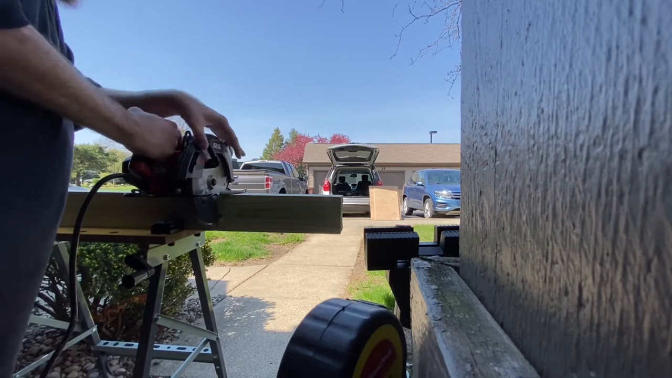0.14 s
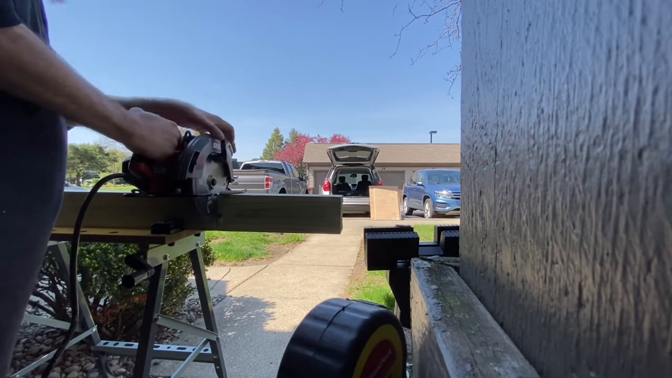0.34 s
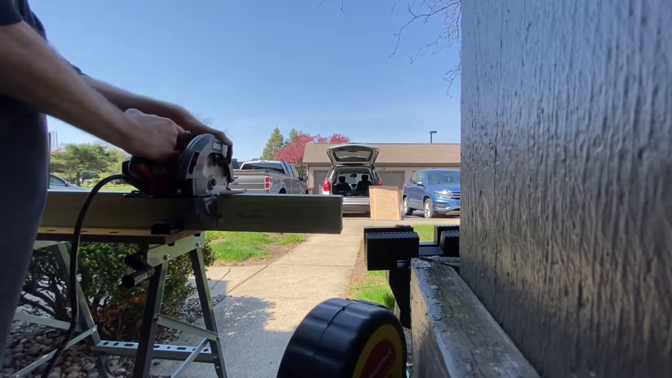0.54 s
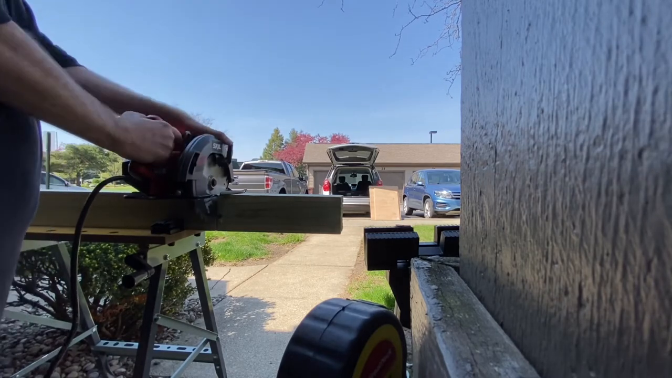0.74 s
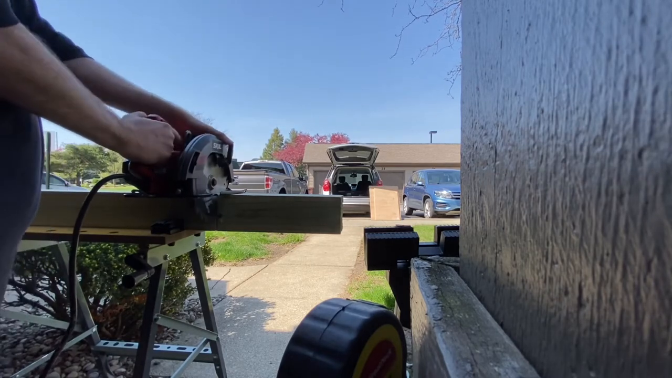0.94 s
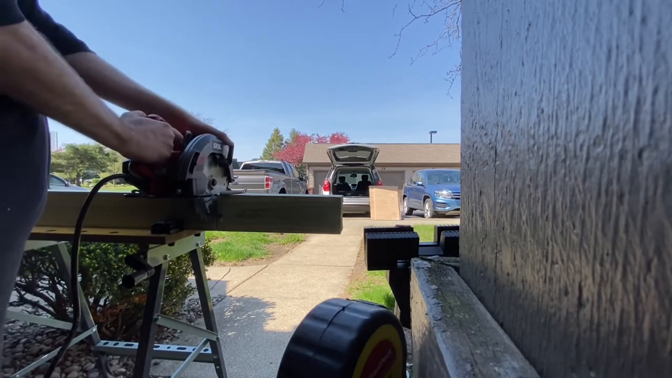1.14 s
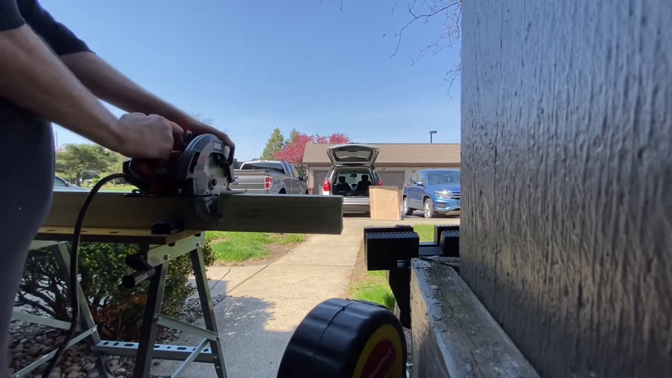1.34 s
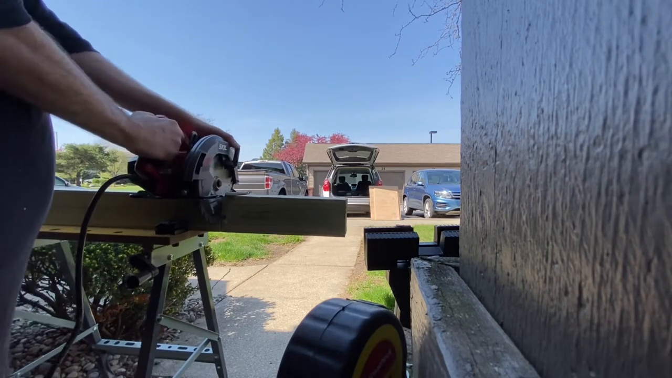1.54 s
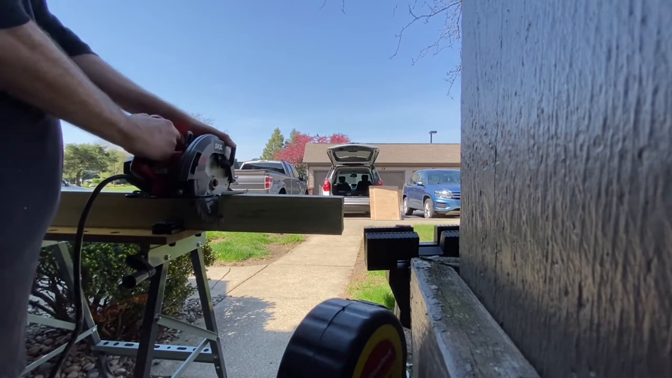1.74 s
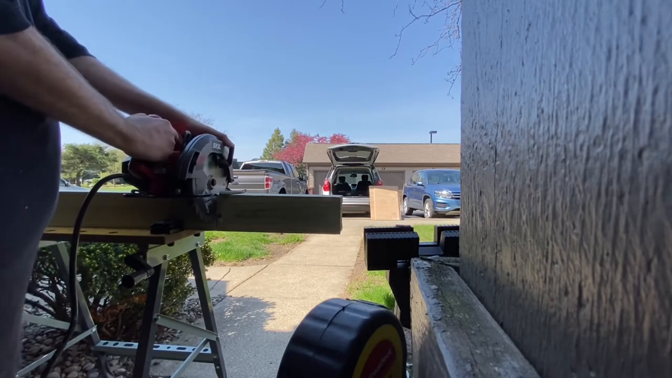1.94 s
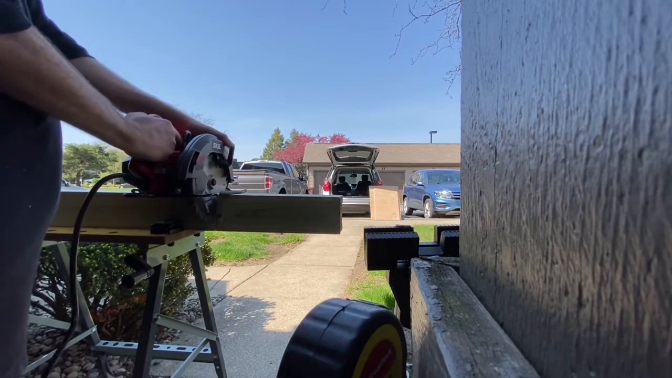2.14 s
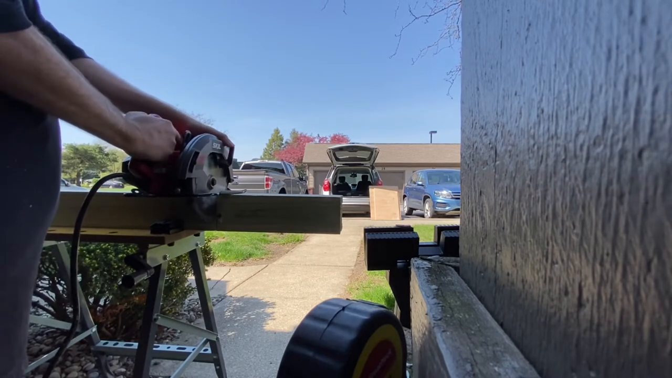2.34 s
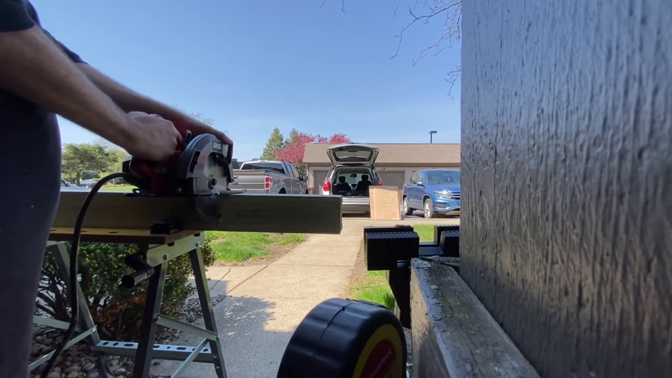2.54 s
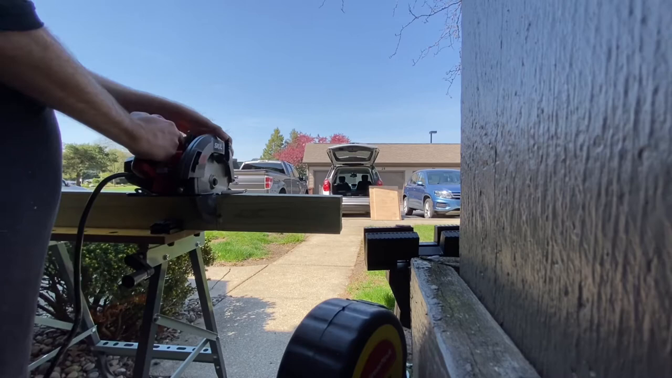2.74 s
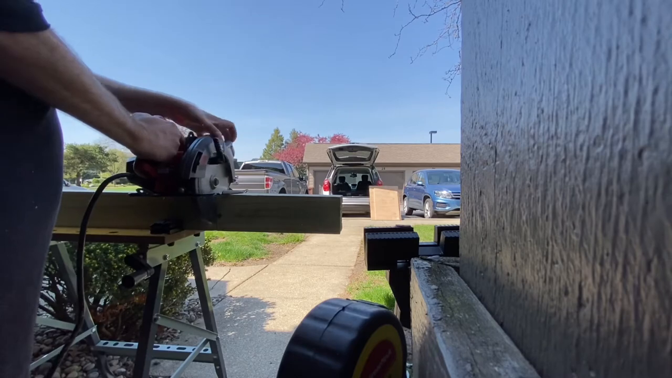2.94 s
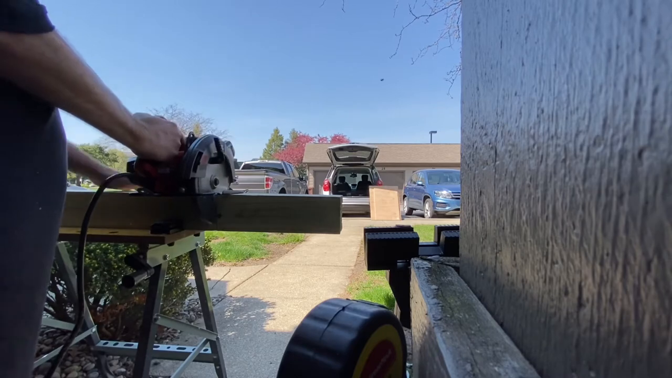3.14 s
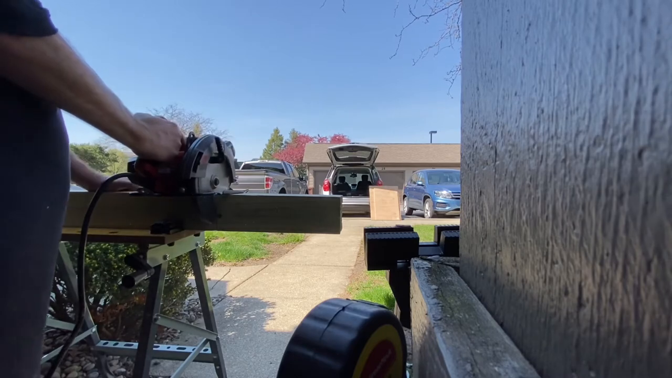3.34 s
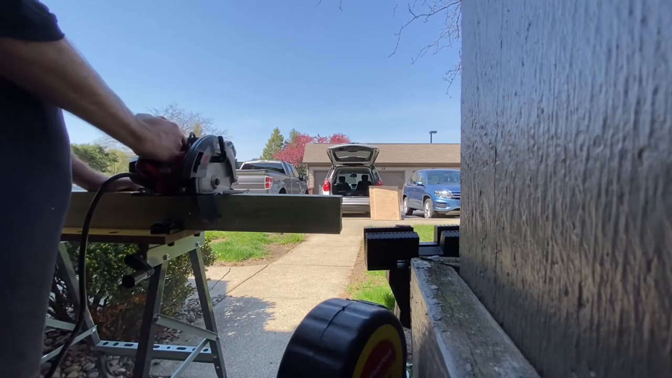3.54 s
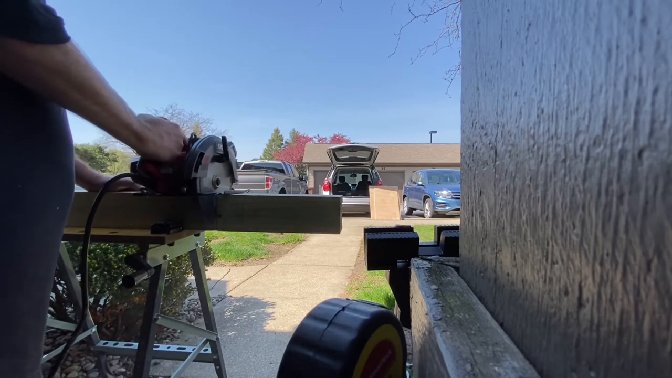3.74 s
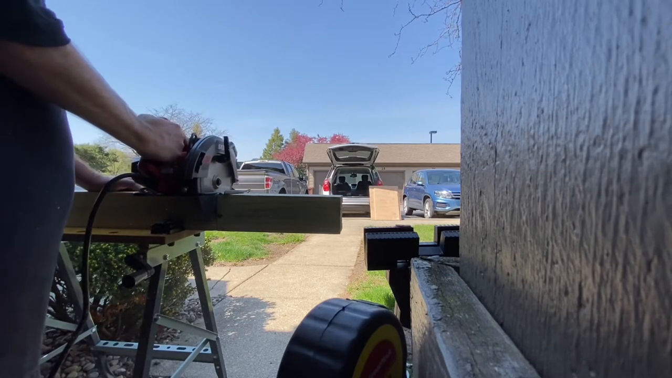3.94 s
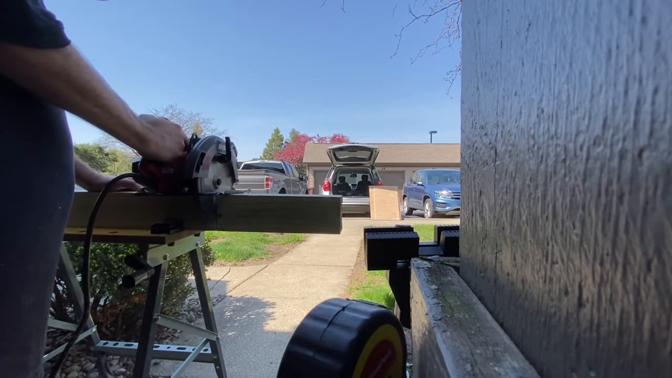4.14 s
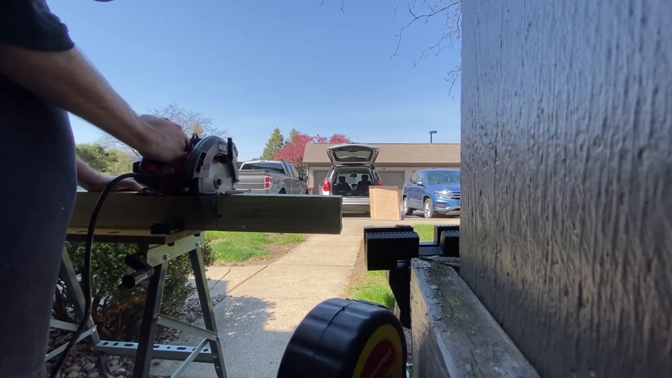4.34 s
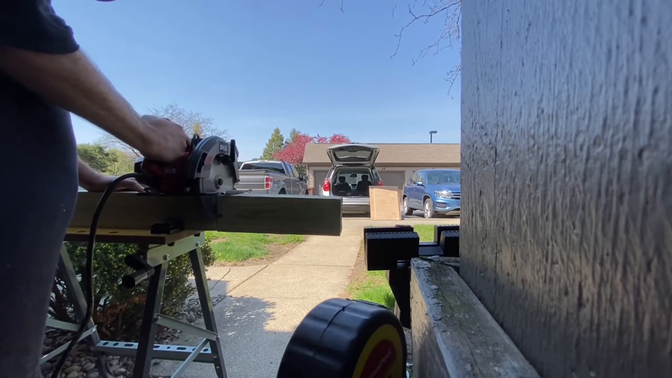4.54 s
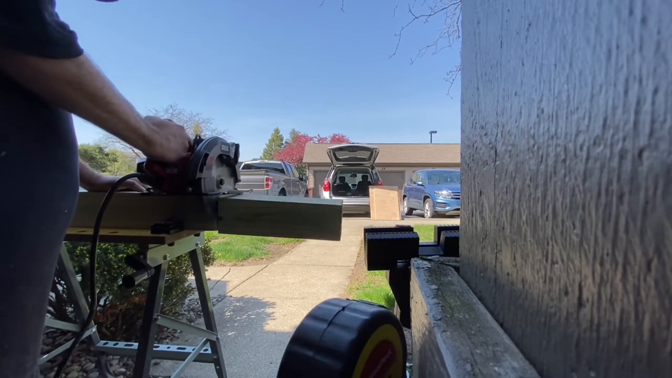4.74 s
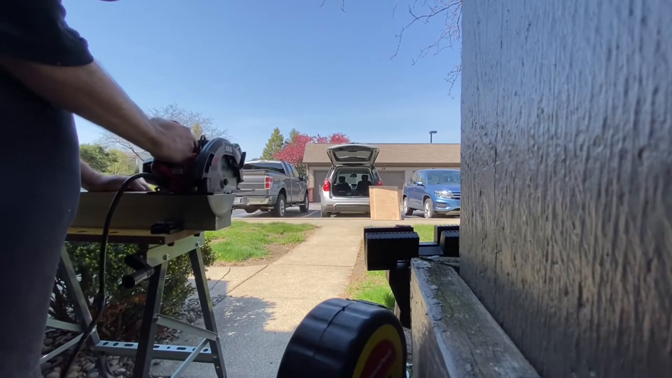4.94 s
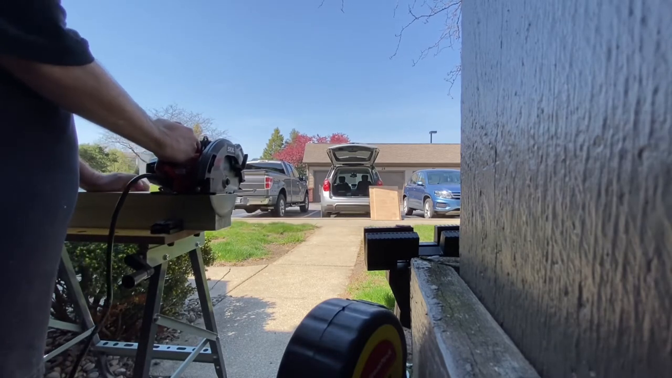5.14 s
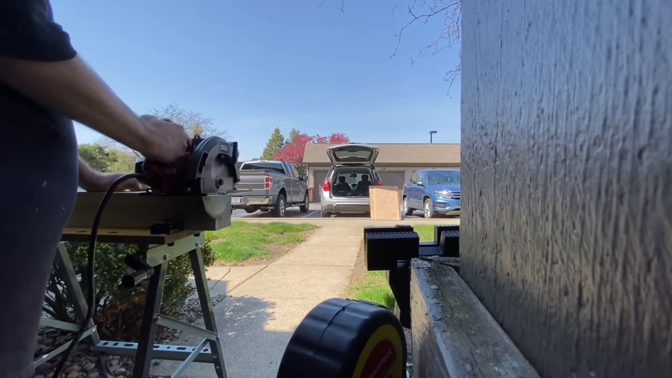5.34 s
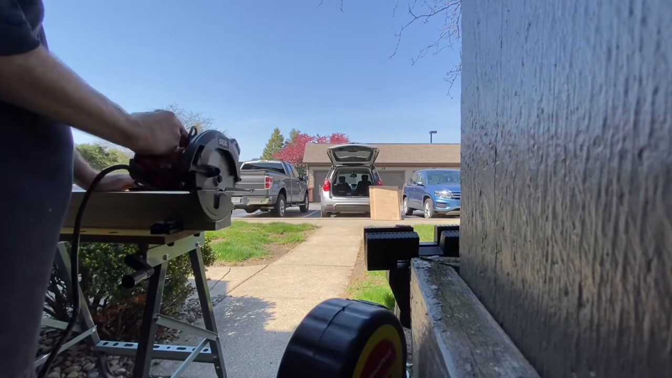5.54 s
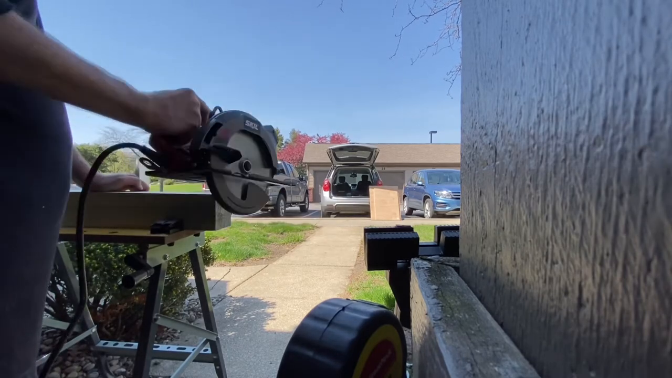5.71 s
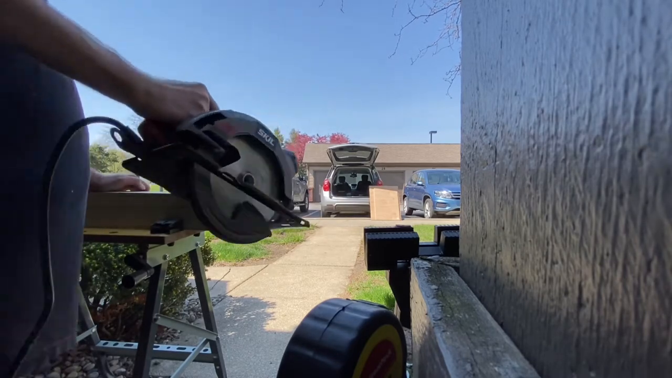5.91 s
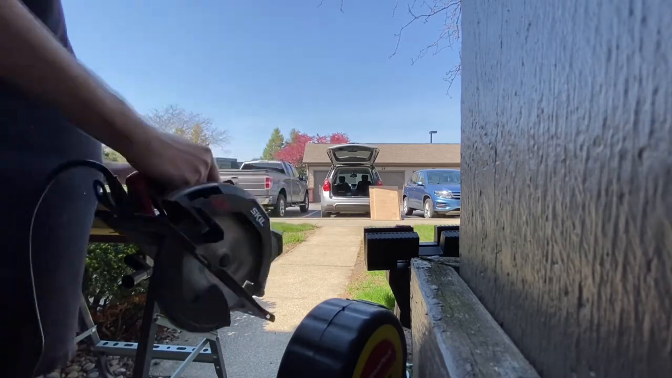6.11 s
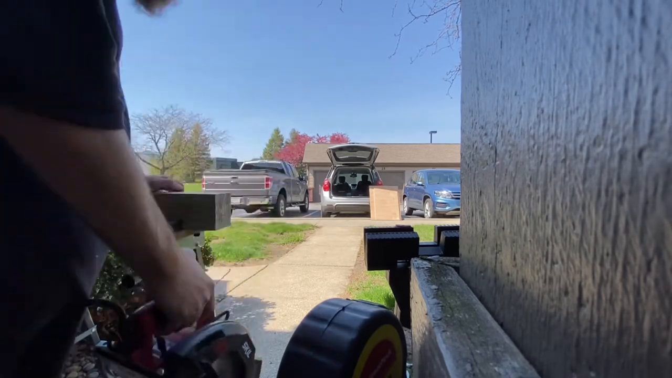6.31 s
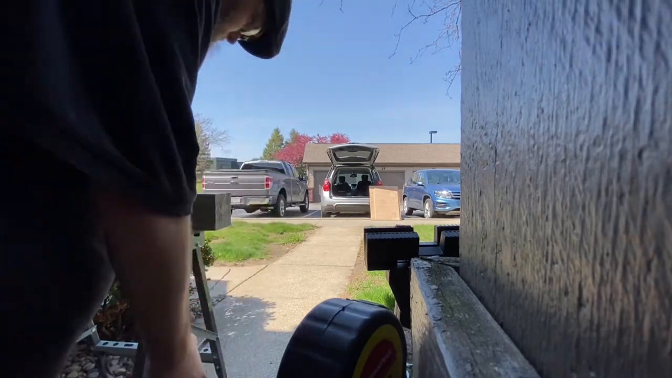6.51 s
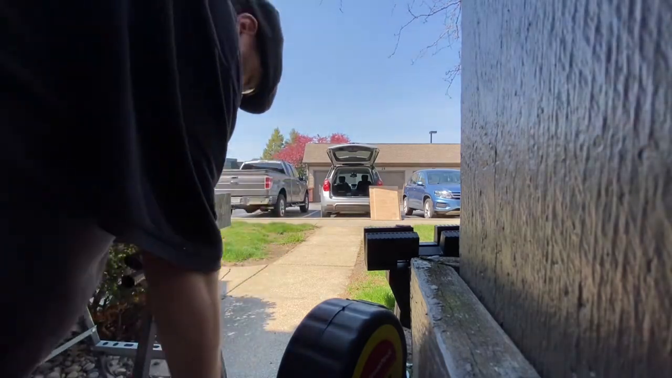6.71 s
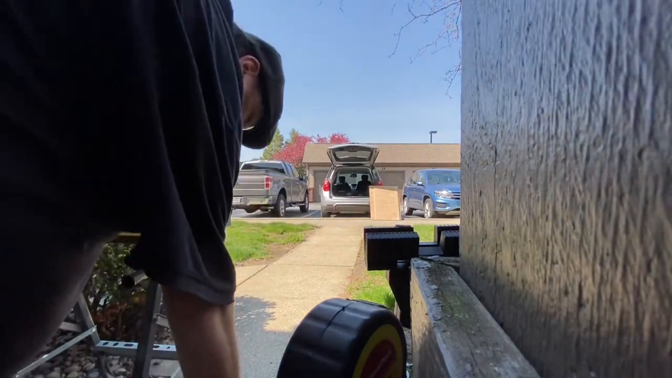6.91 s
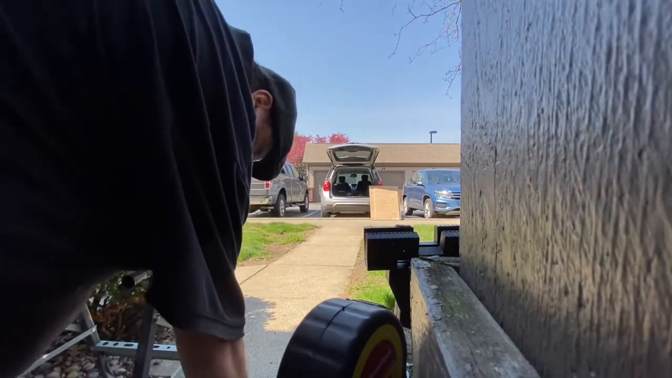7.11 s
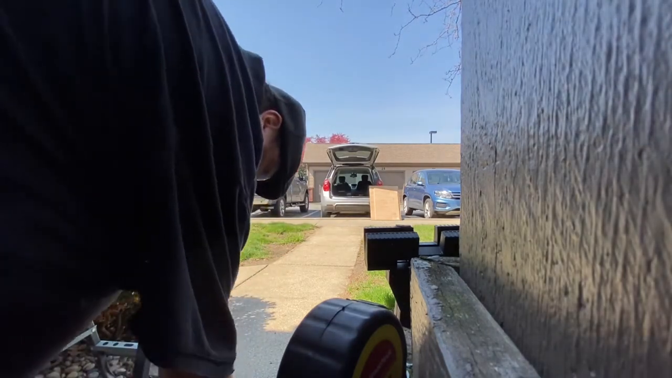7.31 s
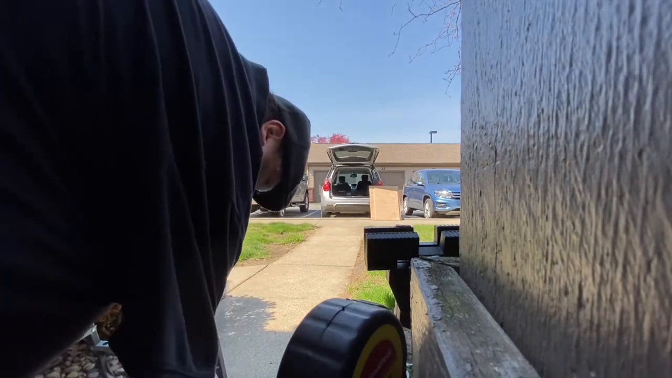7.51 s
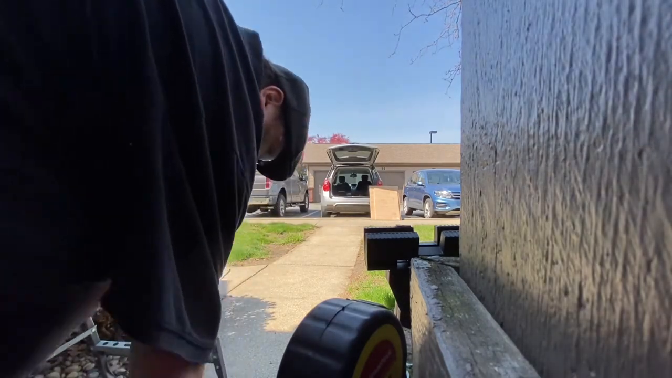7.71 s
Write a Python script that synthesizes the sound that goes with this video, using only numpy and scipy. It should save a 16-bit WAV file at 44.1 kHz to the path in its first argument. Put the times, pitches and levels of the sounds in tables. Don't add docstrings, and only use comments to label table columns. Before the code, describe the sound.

Over a droning air-conditioning unit, a handheld circular saw starts abruptly, cuts wood with harsh hiss, and winds down before landing on gravel.

```python
import sys
import numpy as np
from scipy import signal
from scipy.fft import rfft, irfft, next_fast_len
from scipy.io import wavfile
from scipy.ndimage import uniform_filter1d

SR = 44100
rng = np.random.default_rng(int(sys.argv[2]) if len(sys.argv) > 2 else 0)


def store_wav(level_fs):
    pcm = np.round(np.clip(np.atleast_2d(level_fs), -1, 1) * 32767)
    wavfile.write(sys.argv[1], SR, pcm.T.astype(np.int16))


def rack_gain(trim_db):
    fader = np.asarray(trim_db, float)
    return 10 ** (fader / 20)


N = 342657

FAN_BLADES, PINION_TEETH = 30, 7
RUNNING_HZ = 14050
START_S, OFF_S = 2.133, 4.865
CUT_S = (2.8, 4.5)
# (time [s],
# level [dB])
EFFORT_DB = [(2.133, 14.5), (2.18, 16.5), (2.33, 7), (2.55, 3), (2.75, 2), (3.1, 1.5), (3.33, 3),
             (3.5, 0.25), (4.3, 0), (4.8, -0.5), (5.15, 0), (5.5, 3.5), (5.8, 5.5), (6.2, 4), (6.6, 2.5),
             (7.0, 1.5), (7.77, 0.5)]


def in_time(rows):
    s, *columns = np.transpose(rows)
    return [np.interp(np.arange(N) / SR, s, c) for c in columns]


def at_hz(points, hz):
    table_hz, values = np.transpose(points)
    return np.interp(np.log(hz), np.log(table_hz), values)


def drift(rate):
    r = np.exp(-40 * np.pi * rate / SR)
    slow = signal.lfilter([1], [1, -2 * r, r * r], rng.standard_normal(N // 20 + 2002))[2000:]
    return np.interp(np.arange(N) / 20, np.arange(len(slow)), slow / slow.std())


def two_ports(x, lag_ms):
    return np.array([x, np.interp(np.arange(N) - lag_ms * SR / 1000, np.arange(N), x)])


def sides(left_minus_right_db):
    return rack_gain(left_minus_right_db * np.array([[.5], [-.5]]))


def swell(hz, centre_hz, reach_hz):
    return 1 / (1 + ((hz - centre_hz) / reach_hz) ** 2)


def resonance(x, hz, width_hz):
    r = np.exp(-np.pi * width_hz / SR)
    ring = [1, -2 * r * np.cos(2 * np.pi * hz / SR), r * r]
    return signal.lfilter(np.array([1, 0, -1]) * (1 - r * r) / 2, ring, x)


def turned(x, phase):
    size = next_fast_len(N + 4096)
    hz = np.arange(size // 2 + 1) * SR / size
    return irfft(rfft(x, size) * np.exp(-1j * at_hz(phase, hz + 1)), size)[:N]


def banded_noise(low_hz, colour, balance, likeness, lag_ms, change_db, patchy_db):
    edges = np.geomspace(low_hz, 17000, round(3 * np.log2(17000 / low_hz)) + 1)
    direct = [two_ports(rng.standard_normal(N), lag_ms) for k in range(2)]
    scattered = rng.standard_normal((2, 2, N))
    out, power, together = 0, 0, drift(6.3)
    for k, (low, high) in enumerate(zip(edges, edges[1:])):
        hz = np.sqrt(low * high)
        alike = np.clip(at_hz(likeness, hz), 0, 1)
        white = np.sqrt(alike) * direct[k % 2] + np.sqrt(1 - alike) * scattered[k % 2]
        band = signal.sosfilt(signal.butter(2, [low, high], "band", fs=SR, output="sos"), white)
        colour_db = at_hz(colour, hz)
        level_db = colour_db + change_db(hz) + patchy_db * (0.35 * together + drift(12.7))
        out = out + sides(at_hz(balance, hz)) * band * rack_gain(level_db)
        power += rack_gain(2 * colour_db) * (high - low) * 2 / SR
    return out / np.sqrt(power)


def yard():
    # (frequency [Hz], density [dB per Hz])
    colour = [(18, -59), (30, -44), (108, -1), (238, 0), (301, -9), (537, -12.5), (800, -13.5), (1210, -4),
              (1420, -13.5), (1610, -2), (1940, -15.5), (4730, -29), (6310, -25.5), (9860, -36.5),
              (11500, -35), (12500, -33), (13700, -38), (14300, -37), (15800, -35)]
    # (frequency [Hz], left minus right [dB])
    balance = [(60, -5), (110, -9.5), (200, -2.5), (380, -8), (780, -6), (1200, 0), (1600, 0), (2380, .5),
               (3300, -1.5), (4200, -4), (5400, -1), (8120, 3), (11000, 2.5), (15000, -1.5)]
    # (frequency [Hz], shared part [0-1])
    likeness = [(60, .93), (200, .88), (500, .6), (1000, .7), (1300, .995), (2000, .995), (2300, .6),
                (2700, .3), (4000, .3), (12000, .1)]
    # (frequency [Hz], level [dB])
    compressor = [(129.2, -52), (188.4, -52), (468.3, -62), (699.8, -60), (759.0, -61), (818.3, -60),
                  (872.1, -59), (1066, -64), (1217, -60), (2681, -71), (3031, -68), (4081, -69),
                  (5480, -78), (6062, -77), (6293, -69), (6880, -77), (8511, -71), (8742, -81)]
    # (frequency [Hz], turn [radians])
    port_phase = [(450, 0), (775, 1), (1100, .3), (1600, 0), (2300, -.5), (2700, -1.3), (3200, -1.6),
                  (4200, 0)]
    # (time [s], gain [dB])
    gain = [
        (2.1, -2),
        (2.21, -5),
        (2.34, -16),
        (2.64, -18.5),
        (3.0, -18.5),
        (4.3, -23),
        (5.2, -19.5),
        (6.1, -19.5),
        (7.77, -18),
    ]
    lag_ms = -.312
    level_db = in_time(gain)[0] - 39
    t = np.arange(N) / SR
    drone = banded_noise(41.4, colour, balance, likeness, lag_ms, lambda hz: 0, patchy_db=1.22)
    lines = 0
    for hz, db in compressor:
        line_db = db + 0.5 + 0.61 * drift(22.0)
        line_db = line_db + (hz < 300) * (4.4 * drift(5.6) - 5.5)
        line_db += 16.5 * swell(hz, 188.4, 7.6) * np.exp(-t / 0.51)
        line = rack_gain(line_db) * np.sin(2 * np.pi * hz * t + hz / 2500 * drift(1.7))
        lines = lines + two_ports(line, lag_ms) * sides(at_hz(balance, hz))
    top = signal.butter(4, 14000, "high", fs=SR, output="sos")
    drone = drone - 0.9 * signal.sosfiltfilt(top, drone.mean(axis=0))
    left, right = rack_gain(level_db + 1.5) * drone + rack_gain(level_db + 44) * lines
    return np.array([left, turned(right, port_phase)])


def grit(rows, low_hz, high_hz, per_s):
    clicks = rack_gain(1.1 * rng.exponential(1, (2, N))) * rng.standard_normal((2, N))
    clicks = clicks * (rng.random(N) < per_s / SR)
    band = signal.sosfilt(signal.butter(2, [low_hz, high_hz], "band", fs=SR, output="sos"), clicks + 1e-18)
    t = np.arange(N) / SR
    bursts = sum(rack_gain(db - 20 * np.maximum((s - t) / rise_s, (t - s) / fall_s)) for s, db, rise_s, fall_s in rows)
    return bursts * band / band.std()


def sleeves():
    # (time [s], peak [dB], rise [s per 20 dB], fall [s per 20 dB])
    rustles = [
        (.19, -56.5, .05, .055),
        (.59, -54, .045, .07),
        (.73, -58, .1, .07),
        (1.24, -58, .04, .06),
    ]
    return grit(rustles, 6400, 15000, per_s=4900)


def gravel():
    # (time [s], peak [dB], rise [s per 20 dB], fall [s per 20 dB])
    crunches = [
        (7.221, -50, .006, .07),
        (7.272, -55, .012, .08),
        (7.295, -57, .012, .05),
        (7.463, -54, .006, .05),
    ]
    return grit(crunches, 2500, 9800, per_s=2400)


def knocks():
    # (time [s], peak [dB], frequency [Hz], time to fall 60 dB [s])
    hits = [(4.8418, -22, 320, .019), (4.8412, -30, 800, .01), (4.856, -42, 120, .07),
            (7.221, -35, 4200, .012), (7.22, -40, 2450, .06), (7.229, -39, 2600, .012),
            (7.2215, -48, 7000, .006), (7.2215, -48, 9500, .006), (7.222, -49, 14500, .008),
            (7.242, -40, 4300, .008), (7.272, -42, 4500, .008), (7.281, -42, 4200, .008),
            (7.292, -37, 4500, .011), (7.463, -43, 2400, .012), (7.464, -46, 4100, .01),
            (2.134, -22, 5800, .09), (2.172, -25, 4770, .12), (2.198, -24, 4800, .1),
            (2.24, -27, 4850, .08), (2.228, -20, 3040, .11), (2.262, -22, 3000, .1),
            (2.312, -21, 3150, .08), (2.361, -20, 5760, .05)]
    out, t = np.zeros(N), np.arange(round(.11 * SR)) / SR
    ticks = rng.standard_normal((len(hits), len(t)))
    sag = 380 * .003 * (1 - np.exp(-t / .003))
    for (s, peak_db, hz, t60), tick in zip(hits, ticks):
        ring = np.sin(2 * np.pi * (hz * t + sag)) * rack_gain(-60 * t / t60) * (1 - np.exp(-t / .0005))
        out[round(s * SR):][:len(t)] += rack_gain(peak_db + 3) * (ring + .3 * tick * np.exp(-t / .0015))
    return two_ports(out, .22)


def board_hum():
    t = np.arange(N) / SR
    edge_s = 0.018
    held = np.clip(np.minimum(t - CUT_S[0], CUT_S[1] - t) / edge_s + 1, 0, 1)
    hz = 129 + 3.8 * (t - CUT_S[0])
    return held * rack_gain(1.5 * drift(8) - 59) * np.sin(2 * np.pi * np.cumsum(hz) / SR) * sides(-4)


def rotor():
    # (time [s], fan blade rate [Hz])
    powered = [(2.133, 12230), (2.5, 13350), (2.8, 14020), (3.1, 14530), (3.3, 14530), (3.56, 14010),
               (4.3, 14040), (4.46, 14140), (4.53, 14070), (4.6, 14200), (4.72, 14540), (4.865, 14830)]
    spin_up_gap_hz, spin_up_s = 10930, .0817
    knee_hz, drag_per_s = 4592, .386
    t = np.arange(N) / SR
    run = in_time(powered)[0] - spin_up_gap_hz * np.exp(-np.maximum(t - START_S, 0) / spin_up_s)
    coast = knee_hz * np.tan(np.arctan(powered[-1][1] / knee_hz) - drag_per_s * np.maximum(t - OFF_S, 0))
    return uniform_filter1d(np.where(t < OFF_S, run, coast), size=900)


def rubs(column):
    # (time [s], half length [s], hiss change [dB], casing ring change [dB])
    touches = [(2.262, 0.072, -3, 14), (2.329, 0.017, 2, 9), (2.362, 0.0088, 3.5, 7), (2.497, 0.07, 2, 4),
               (3.306, 0.058, -1.5, 7), (3.435, 0.025, -2.5, 12), (4.085, 0.055, -0.3, 10),
               (4.476, 0.18, 1, 11), (5.057, 0.019, 2, 14.5), (5.278, 0.058, 3, 10), (5.512, 0.072, 0, 5),
               (5.753, 0.035, 0, 9), (2.41, .04, -1.5, 8), (6.075, 0.086, 0.5, 12.5),
               (6.788, 0.02, -1, 6.5), (6.852, 0.0086, 0, 11)]
    t = np.arange(N) / SR
    return sum(row[column] * np.exp(-((t - row[0]) / row[1]) ** 2) for row in touches)


def saw_hiss(lag_ms, fan_hz, throb):
    # (frequency [Hz], density [dB per Hz])
    colour = [(150, -62), (250, -29), (287, -33.5), (421, -16.5), (1000, -6.5), (1230, -13), (1420, -1.5),
              (2380, -4.5), (3740, 1), (4860, -6.5), (7490, -4), (11000, -4.5), (12800, -9), (14400, -3.5),
              (15800, -11)]
    # (frequency [Hz], left minus right [dB])
    balance = [(60, -0.5), (200, -15), (380, -3.5), (700, 3), (1150, 6.5), (1450, 0), (1780, 6),
               (2380, 5.5), (2900, 6.5), (3400, 2), (4400, -3.5), (5400, 2), (8120, 0.5), (10500, 5),
               (13500, 1), (15000, 4.5)]
    # (frequency [Hz], shared part [0-1])
    likeness = [(300, .7), (800, .85), (1200, .5), (2500, .6), (3800, .75), (5000, .55), (6500, .3),
                (11000, .25), (13000, .8), (14600, .25)]
    # (frequency [Hz], share of effort [dB per dB], speed slope [dB per dB], brush drag [dB])
    layers = [
        (1040, 1.55, 2.5, -29),
        (4850, 1.626, 2.5, -30),
        (10600, 1.49, 3.5, -25.5),
    ]
    speed_db, effort_db = 20 * np.log10(fan_hz / RUNNING_HZ), in_time(EFFORT_DB)[0]
    curves = []
    for hz, share, slope, drag_db in layers:
        power = rack_gain(2 * slope * speed_db) + rack_gain(2 * (drag_db + 0.27 * speed_db))
        curves.append(10 * np.log10(power) + share * effort_db + rubs(column=2))

    def change_db(hz):
        place = np.interp(np.log(hz), np.log(np.array(layers)[:, 0]), np.arange(3))
        below = min(int(place), 1)
        level_db = curves[below] + (place - below) * (curves[below + 1] - curves[below])
        wake, usual = [swell(np.log2(hz / (0.78 * rate_hz)), 0, 0.43) for rate_hz in (fan_hz, RUNNING_HZ)]
        return level_db + 4.5 * (wake - usual)

    hiss = banded_noise(237.0, colour, balance, likeness, lag_ms, change_db, patchy_db=1.1)
    return rack_gain(-27) * hiss * (1 + 0.035 * throb + 0.019 * drift(100))


def whine(lag_ms, fan_hz):
    # (multiple of the mesh rate [1], level [dB])
    mesh_overtones = [(13 / 7, -6), (2, -1), (3, -6), (4, -14), (6, -14), (7, -9), (10, -12), (12, -7),
                      (14, -8)]
    # (frequency [Hz], reach [Hz], lift [dB])
    mesh_swells = [(2420, 150, 24), (2830, 140, 16)]
    # (frequency [Hz], reach [Hz], lift [dB])
    driven_swells = [(5830, 160, 9), (6190, 70, 6), (4800, 120, 1)]
    # (multiple of rotor speed [1], level against the fan [dB])
    fan_sides = [(24, -8), (26, -7), (27, -8), (28, -10), (29, -9), (31, -6)]
    gear_teeth = 40
    rotor_hz, effort_db = fan_hz / FAN_BLADES, in_time(EFFORT_DB)[0]
    t = np.arange(N) / SR
    unloaded = 1 - np.exp(-np.maximum(t - OFF_S, 0) / .4)

    def law(running_db, share, slope, off_db):
        return running_db + share * effort_db + slope * 20 * np.log10(fan_hz / RUNNING_HZ) + off_db * unloaded

    fan_db = law(-40.5, .9, 1.3, -2.5)
    mesh_db = law(-49, 1.5, .3, -9)
    overtone_db = law(-54, .6, 1.0, 3.5)
    hum_db = law(-37.5, .3, 2.2, -30)
    half_db = law(-49.5, 1.4, 2.4, -7)

    mesh_hz = 2 * PINION_TEETH * rotor_hz
    fan_db -= 10 * np.log10(1 + (2750 / fan_hz) ** 9.6)
    loose = .22 + (1 - .22) * unloaded
    mesh_db += loose * sum(db * swell(mesh_hz, hz, reach_hz) for hz, reach_hz, db in mesh_swells)
    mesh_db -= 10 * np.log10(1 + (2250 / mesh_hz) ** 8.0)
    mesh_db += (unloaded == 0) * sum(db * swell(mesh_hz, hz, reach_hz) for hz, reach_hz, db in driven_swells)
    hum_db += 5 * swell(4 * rotor_hz, 1945, 25) - 3

    turn = 2 * np.pi * np.cumsum(rotor_hz) / SR
    peak_turn = turn[round(5.954 * SR)]
    blade = (turn - peak_turn) * PINION_TEETH / gear_teeth

    def tone(order, level_db, jitter, flutter_db):
        audible = np.clip((15500 - order * rotor_hz) / 500, 0, 1)
        level = np.sqrt(2) * rack_gain(level_db + flutter_db * drift(24.0))
        return audible * level * np.sin(order * turn + jitter * drift(32))

    mesh = tone(2 * PINION_TEETH, mesh_db, jitter=.3, flutter_db=2.0)
    overtones = sum(tone(2 * PINION_TEETH * k, overtone_db + db, jitter=.5, flutter_db=3.5)
                    for k, db in mesh_overtones)
    strong = resonance(resonance(overtones, 2380, 260), 2380, 260)
    mild = resonance(overtones, 3300, 350) + resonance(overtones, 2830, 200)
    overtones = overtones + rack_gain(16) * strong + rack_gain(9) * mild
    overtones = signal.sosfilt(signal.butter(8, 1950, "high", fs=SR, output="sos"), overtones)
    throb = 1 + .7 * np.cos(2 * blade + .25 * drift(8)) + .2 * np.cos(4 * blade) + .25 * np.cos(blade)
    hum = tone(4, hum_db, jitter=.6, flutter_db=3.0) + tone(2, half_db, jitter=.4, flutter_db=2.0)
    fan = tone(FAN_BLADES, fan_db, jitter=.5, flutter_db=2.5)
    cutting = np.interp(t, [CUT_S[0] - .4, CUT_S[0], OFF_S - .1, OFF_S], [0, 1, 1, 0])
    fan += cutting * sum(tone(k, fan_db + db - 5 + effort_db, jitter=.5, flutter_db=4.0) for k, db in fan_sides)
    fan += cutting * tone(FAN_BLADES, fan_db - 3, jitter=4.0, flutter_db=2.0)
    return two_ports(mesh * throb + overtones * (.6 + .4 * throb) + hum + fan, lag_ms) * sides(3), throb


def casing_ring(lag_ms, fan_hz, throb):
    # (frequency [Hz], width [Hz], level [dB])
    modes = [(2310, 103, 1.5), (2456, 114, 3.5), (2698, 100, -3), (3004, 46, -3.5), (3250, 83, -29),
             (4800, 55, -11.5), (5840, 90, -20)]
    # (multiple of the mesh rate [1], lift [dB])
    crossings = [(1, 17.5), (2, 6), (3, 2), (4, 0)]
    mesh_hz = fan_hz * 2 * PINION_TEETH / FAN_BLADES
    level_db = -46 + 1.2 * in_time(EFFORT_DB)[0] + 0.97 * 20 * np.log10(fan_hz / RUNNING_HZ) + rubs(column=3)
    level_db += sum(db * swell(k * mesh_hz, 2510, 139) for k, db in crossings)
    rattle = rng.standard_normal(N) * (1 + .55 * (throb - 1)) * rack_gain(0.27 * drift(48))
    ring = sum(rack_gain(db) * resonance(resonance(rattle, hz, 0.5 * width_hz), hz, width_hz)
               for hz, width_hz, db in modes)
    return two_ports(rack_gain(level_db) * ring / ring.std(), lag_ms) * sides(6)


def hollows(x):
    # (from [s], until [s], fading over [s], frequency [Hz], width [Hz], share taken out [0-1])
    dips = [
        (2.0, 6.2, .1, 3650, 70, .6),
        (2.0, 5.9, .1, 3860, 110, .55),
        (5.8, 9, .4, 15300, 2600, .9),
        (5.3, 5.95, .15, 3750, 500, .55),
        (6.25, 9, .25, 1610, 300, .99),
        (2.0, 5.6, .1, 1390, 70, .5),
        (5.7, 9, .3, 4800, 120, .3),
        (6.3, 9, .3, 2720, 200, .1),
    ]
    t = np.arange(N) / SR
    for s, until_s, over_s, hz, width_hz, share in dips:
        edges_hz = [hz - width_hz / 2, hz + width_hz / 2]
        band = signal.sosfiltfilt(signal.butter(2, edges_hz, "band", fs=SR, output="sos"), x)
        x = x - share * np.clip(np.minimum(t - s, until_s - t) / over_s, 0, 1) * band
    return x


def wall_turn(x):
    # (frequency [Hz], turn [radians])
    board_phase = [(700, 0), (1675, .4), (1850, -1.6), (2050, -2.1), (2300, -1.2), (2700, -1.0),
                   (3190, 2.0), (3700, .7), (4910, .4), (6290, -.6), (7670, -2.1), (10600, -4.4),
                   (11400, -5.9), (13800, -12.5), (14200, -12.4), (15400, -16.2)]
    # (frequency [Hz], turn [radians])
    lifted_phase = [(775, .9), (1075, 1.1), (1300, 2.0), (1700, 1.7), (2000, .2), (2350, 1.9), (2600, .8),
                    (2875, 1), (3025, -.4), (4200, -.9), (5000, -.2), (5800, -.4), (6600, 1.2), (7000, 0)]
    # (frequency [Hz], turn [radians])
    lowered_phase = [(700, -1.5), (1460, -1), (1980, -1), (2350, -2.3), (2600, -3.3), (2900, -4.6),
                     (3200, -6.4), (4500, -6.0), (5400, -6.3)]
    right = turned(x[1], board_phase)
    for s, over_s, phase in ((5.5, .4, lifted_phase), (6.25, .25, lowered_phase)):
        gone = np.clip((np.arange(N) / SR - s) / over_s, 0, 1) * np.pi / 2
        right = np.cos(gone) * right + np.sin(gone) * turned(x[1], phase)
    return np.array([x[0], right])


def saw():
    # (frequency [Hz], width [Hz], level [dB])
    casing = [(1233, 102, 8), (1800, 125, 1.5), (2190, 190, -3), (2437, 37, 5), (2540, 410, -22),
              (3463, 41, -4.5), (4760, 43, 4.5), (5220, 57, 0), (6450, 120, -0.5), (1080, 35, 1.5),
              (8630, 52, -4), (6230, 50, -26), (6940, 72, -1.5), (11140, 3100, -7.5), (16300, 400, -11),
              (3110, 53, -4.5)]
    # (time [s], right lags [ms], extra left [dB])
    position = [
        (2.1, .3628, 0),
        (5.35, .3628, 0),
        (5.7, .1814, 1.5),
        (6.3, .1814, 1.5),
        (6.6, .1814, -2),
        (7.77, .1814, -2),
    ]
    lag_ms, left_db = in_time(position)
    fan_hz = rotor()
    tones, throb = whine(lag_ms, fan_hz)
    hiss = saw_hiss(lag_ms, fan_hz, throb)
    rung = hiss + sum(rack_gain(db) * resonance(hiss, hz, width_hz) for hz, width_hz, db in casing)
    rung = rack_gain(-1.5) * rung + tones + casing_ring(lag_ms, fan_hz, throb)
    since = np.arange(N) / SR - START_S
    switch = np.clip(since / 0.0025, 0, 1) * rack_gain(14 * np.exp(-np.abs(since) / .012))
    return switch * wall_turn(hollows(rung)) * sides(left_db)


def scene():
    return yard() + sleeves() + gravel() + knocks() + board_hum() + saw()


def band_limit(x):
    return signal.sosfilt(signal.butter(12, 15740, fs=SR, output="sos"), x)


def record(dry):
    thin = signal.sosfilt(signal.butter(1, 40, "high", fs=SR, output="sos"), dry)
    thin = signal.sosfilt(signal.cheby2(16, 70, 16300, fs=SR, output="sos"), thin)
    narrow_band = signal.butter(4, (12000, 13750), "band", fs=SR, output="sos")
    odd = signal.sosfiltfilt(narrow_band, thin[0] - thin[1]) / 2
    mix = thin - .65 * odd * [[1], [-1]]
    return band_limit(mix)


dry = scene()
out = record(dry)
store_wav(out)
```